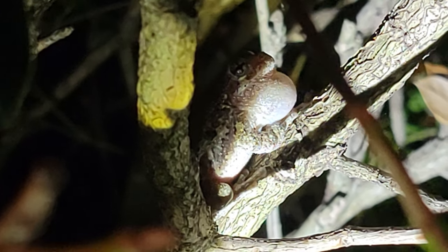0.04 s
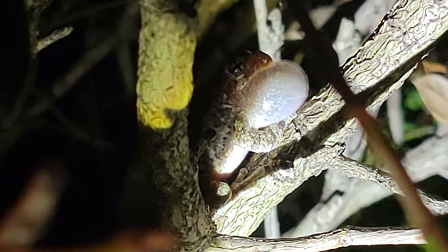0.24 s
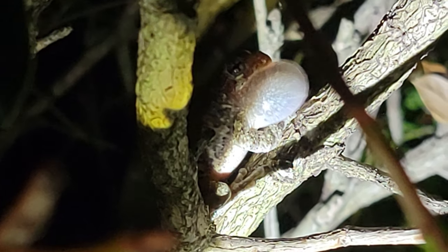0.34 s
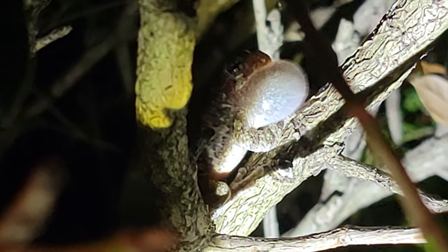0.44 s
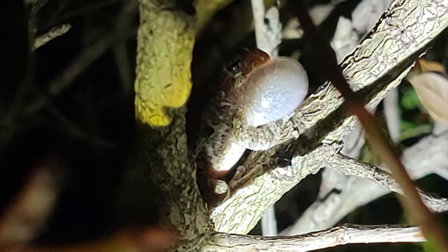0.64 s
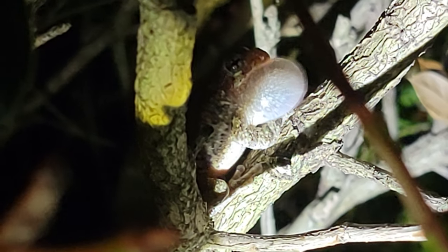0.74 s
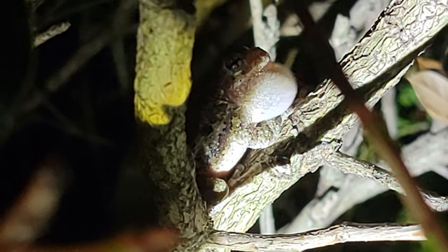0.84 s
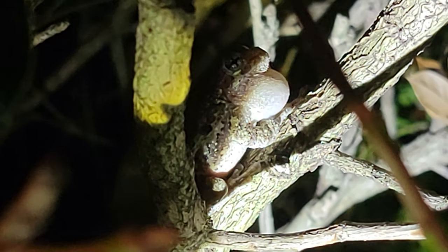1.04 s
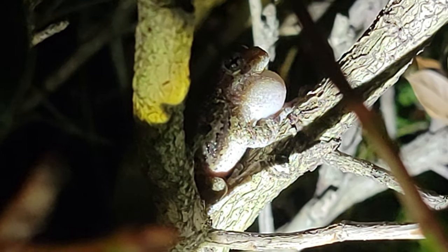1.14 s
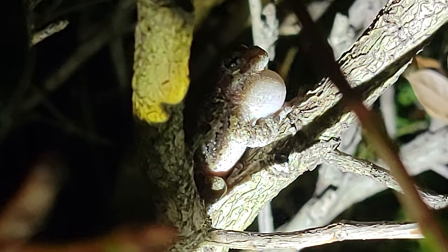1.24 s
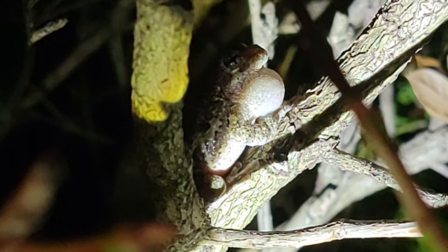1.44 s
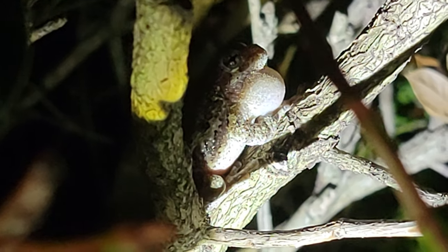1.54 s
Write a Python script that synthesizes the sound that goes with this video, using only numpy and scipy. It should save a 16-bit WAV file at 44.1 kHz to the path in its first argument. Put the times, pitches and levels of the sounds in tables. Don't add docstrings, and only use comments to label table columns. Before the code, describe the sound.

At night among branches, a distant frog's weak trill ends as a near frog bursts into a bright, hard, purring trill that slows slightly and stops, leaving soft hiss, rumble, a thin insect tone and leaf ticks.

```python
import sys
import numpy as np
from scipy import signal
from scipy.fft import rfft, irfft, next_fast_len
from scipy.io import wavfile
from scipy.ndimage import uniform_filter1d, minimum_filter1d

SR = 44100
rng = np.random.default_rng(int(sys.argv[2]) if len(sys.argv) > 2 else 0)


def materialize(psi):
    bounded = np.clip(np.atleast_2d(psi).T, -1, 1)
    quanta = np.round(bounded * 32767).astype(np.int16)
    wavfile.write(sys.argv[1], SR, quanta)


def makeup_ratio(level_db):
    decades = np.asarray(level_db, float) / 20
    return 10 ** decades


N = 70560
ECHO_HZ, ECHO_WIDTH_HZ = 2361, 1700


def evened(x):
    return x / np.sqrt(np.mean(x ** 2) + 1e-20)


def read(points, hz):
    point_hz, value = np.transpose(points)
    return np.interp(np.log(hz + 1), np.log(point_hz + 1), value)


def resonate(x, hz, width_hz):
    turn = np.exp(2j * np.pi * hz * np.arange(x.shape[-1]) / SR)
    r = np.exp(-np.pi * width_hz / SR)
    return 2 * (turn * signal.lfilter([1 - r], [1, -r], x / turn + 1e-18)).real


def resonate_twice(x, hz, width_hz):
    return resonate(resonate(x, hz, width_hz), hz, width_hz)


def delay(x, ms):
    size = next_fast_len(N + SR // 10)
    phase = np.exp(-2j * np.pi * np.fft.rfftfreq(size, 1 / SR) * ms / 1000)
    return irfft(rfft(x, size) * phase, size)[:N]


# freq_hz, density_db
FLOOR_SPECTRUM = [(25, -17.5), (45, -7.5), (74, -3.5), (250, -20.5), (600, -24), (1000, -18), (2400, -17.5),
                  (15900, -25.5)]
# freq_hz, correlation_-1_to_1
LIKENESS = [(60, 1), (240, 0.96), (950, -0.57), (3770, -0.049), (15000, -0.18)]
# freq_hz, lean_db
LEAN_SPECTRUM = [(60, -2.17), (240, 2.05), (950, 2.5), (3770, 9.5), (15000, 1.5)]


def night_floor():
    level_db, patch_db, flicker_db = -47.5, 2.0, .9
    frames, hz = N // 256 + 5, np.fft.rfftfreq(1024, 1 / SR)
    a, b, c, d, patches = rng.standard_normal((frames, 513, 5)).T
    patches = uniform_filter1d(patches, size=14, axis=0)
    patches = evened(uniform_filter1d(patches, size=6, axis=1))
    flicker = evened(uniform_filter1d(rng.standard_normal(frames), size=3))
    same = np.clip(read(LIKENESS, hz), -1, 1)[:, None]
    left = a + 1j * b
    right = same * left + np.sqrt(1 - same ** 2) * (c + 1j * d)
    lean_db = np.array([.5, -.5])[:, None, None] * read(LEAN_SPECTRUM, hz)[:, None]
    shape_db = read(FLOOR_SPECTRUM, hz)[:, None]
    z = np.array([left, right]) * makeup_ratio(shape_db + patch_db * patches + flicker_db * flicker + lean_db)
    return makeup_ratio(level_db) * evened(signal.istft(z, nperseg=1024, noverlap=768)[1][:, :N])


# pitch_hz, width_hz, level_db
HUMS = [
    (60, 6.6, -59.5),
    (75, 6, -56.5),
    (118.11, 9.5, -60),
    (358.2, 5.5, -69),
    (595.6, 12, -78.5),
    (2853, 60, -63),
]


def hums():
    spread = 0.41
    out = np.zeros((2, N))
    for hz, width_hz, level_db in HUMS:
        noise = rng.standard_normal(N) + spread * rng.standard_normal((2, N))
        out += makeup_ratio(level_db) * evened(resonate_twice(noise, hz, width_hz))
    return out


# start_s, level_db, pitch_hz, width_hz, length_s
RUSTLE_EVENTS = [(.005, -42, 60, 30, 0.0562), (0.049, -55, 690, 91, 0.069), (0.255, -52, 443, 600, .08),
                 (0.257, -47.5, 7000, 9000, 0.043), (1.04, -50.5, 1800, 1500, .03),
                 (1.068, -41, 2100, 500, .018), (1.098, -55.5, 2406, 2500, .06),
                 (1.26, -74, 1400, 300, .02), (1.29, -59.5, 980, 200, .025),
                 (1.413, -44.5, 2100, 2200, .016), (1.431, -47, 1600, 900, 0.0337),
                 (1.46, -49.5, 4000, 5000, .06), (1.505, -47.5, 4000, 6000, 0.027),
                 (1.51, -54, 560, 200, 0.0633), (1.562, -50, 350, 60, 0.074)]


def rustles():
    out, t = np.zeros((2, N + SR)), np.arange(SR // 10) / SR
    for start_s, level_db, hz, width_hz, length_s in RUSTLE_EVENTS:
        crackle_db = 2.5 * np.minimum(rng.exponential(1, len(t)), 4)
        grit = rng.standard_normal((3, len(t))) * makeup_ratio(crackle_db)
        burst = evened(resonate_twice(grit[:2] * .6 + grit[2], hz, width_hz))
        swell = np.sin(np.pi * np.minimum(t / length_s, 1) ** .6)
        out[:, round(start_s * SR):][:, :len(t)] += makeup_ratio(level_db) * burst * swell
    return out[:, :N]


def thicket(x, t60_s):
    taps = np.zeros((2, SR // 2))
    at = np.arange(100, SR // 2 - 40, 40) + rng.integers(0, 40, (2, (SR // 2 - 101) // 40))
    np.put_along_axis(taps, at, rng.choice([-1., 1.], at.shape), 1)
    taps *= makeup_ratio(-60 * np.arange(SR // 2) / SR / t60_s)
    return signal.fftconvolve(x, taps / np.linalg.norm(taps[0]), axes=1)[:, :N]


# delay_ms, left_db, right_db
BRANCH_ECHOES = [(1.9345, -32, -13.5), (4.4183, -8, -9.5), (7.609, -11.5, -19.5), (11.017, -21, -27),
                 (15.531, -14.5, -30.5), (26, -20.5, -27), (40.42, -29.5, -36.5)]


def branches(x):
    y = resonate(x, ECHO_HZ, ECHO_WIDTH_HZ)
    out = np.zeros((2, N))
    for delay_ms, left_db, right_db in BRANCH_ECHOES:
        out += [makeup_ratio(left_db) * delay(y[0], delay_ms), makeup_ratio(right_db) * delay(y[1], delay_ms * 1.2)]
    return out


# multiple, level_db
LARYNX = [(1, 0), (2, 2.5), (3, -8.5), (4, -26), (5, -27), (6, -20.5), (7, -34)]


def trill(times_s, effort):
    rise_s, fall_s, swell_power = .0064, .0032, 0.607
    low_hz, high_hz, step_at_s, step_s = 1163.5, 1400, -0.001678, 0.001858
    scoop_hz, scoop_s = 175.6, 0.000748
    wobble, sway_db, rasp_db = 0.01047, 0.48, -22
    pad = SR // 10
    out = np.zeros(N + SR)
    effort_s, level_db, over_db, pitch, stretch = np.transpose(effort)
    t = np.arange(-rise_s, fall_s, 1 / SR)
    for at in times_s:
        pitch_luck, level_luck, bright_luck = rng.standard_normal(3)
        length = np.interp(at, effort_s, stretch)
        phase = np.where(t < 0, t / rise_s, t / fall_s) / length
        swell = np.cos(np.pi / 2 * np.clip(phase, -1, 1)).clip(0) ** swell_power
        step = (1 + np.tanh((t / length - step_at_s) / step_s)) / 2
        scoop = scoop_hz * np.exp(-(t + rise_s * length).clip(0) / scoop_s)
        glide_hz = low_hz + (high_hz - low_hz) * step - scoop_hz * 0 - scoop
        glide_hz = glide_hz * np.interp(at, effort_s, pitch) * (1 + wobble * pitch_luck)
        turn = 2 * np.pi * np.cumsum(glide_hz) / SR
        bright_db = np.interp(at, effort_s, over_db) + sway_db * bright_luck
        tone = sum(makeup_ratio(db + (k > 1) * bright_db) * np.cos(k * turn) for k, db in LARYNX)
        rasp = makeup_ratio(rasp_db + bright_db) * rng.standard_normal(len(t))
        gain = makeup_ratio(np.interp(at, effort_s, level_db) + sway_db * level_luck)
        start = round((at - rise_s) * SR) + pad
        out[start:start + len(t)] += gain * swell * (tone + rasp)
    return out[pad:][:N]


# pitch_hz, width_hz, left_db, right_db, left_lag_ms
SAC_MODES = [(1290.6, 356.3, 0.5, 2, -0.1309), (1969.5, 130, 2, 5, -0.0087),
             (2355.9, 167.3, 5, 1.5, 0.4068), (2705.4, 378.7, 0.5, -2.95, .38), (3117, 250, -13, -4.5, .3),
             (3831, 202.8, 1, 3, 0.218), (4986, 170, 4.5, 1, 0.287), (5932, 130, 1, 2.5, .01),
             (6250, 700, -15.5, -17.5, .01), (7424, 300.4, 5, 5, 2.005), (8233, 61, 0.5, -4, .01)]


def sac(x):
    out = np.zeros((2, N))
    for k, (hz, width_hz, left_db, right_db, left_lag_ms) in enumerate(SAC_MODES):
        ring = (-1) ** k * resonate_twice(x, hz, width_hz * 1.5)
        out += [makeup_ratio(left_db) * delay(ring, left_lag_ms), makeup_ratio(right_db) * ring]
    return out


# time_s, level_db, overtone_db, pitch_factor, length_factor
FAR_FROG_EFFORT = [
    (0, -30.5, 4, 0.9226, 1),
    (0.101, -29, 4.5, 0.9326, 0.75),
    (.2, -32.5, 8, 0.9544, 1),
    (.225, -30, 8.5, .98, .75),
    (.245, -18, -5.73, 0.968, 0.91),
    (.266, -17.5, 4, .98, 0.86),
    (.287, -19.5, 6, .98, 0.77),
]


def far_frog():
    first_s, gap_s, pulses = .0066, .01995, 15
    pan_db, dull_hz, wet_db = 1.34, 3062, 2
    times_s = first_s + np.arange(pulses) * gap_s - .0003
    call = sac(trill(times_s, FAR_FROG_EFFORT)) * makeup_ratio([[pan_db], [-pan_db]])
    call = signal.sosfilt(signal.butter(8, dull_hz, fs=SR, output="sos"), call)
    return call + makeup_ratio(wet_db) * thicket(resonate(call, ECHO_HZ, 800), t60_s=0.096)


LEAD_INS_S = [.191, .214]
# pulse_number, gap_ms
PULSE_GAPS = [(1, 21.05), (2, 20.25), (8, 20.4), (14, 20.76), (21, 21.15), (27, 21.36), (31, 21.53),
              (32, 22.15), (33, 24.35)]
# time_s, level_db, overtone_db, pitch_factor, length_factor
NEAR_FROG_EFFORT = [
    (.19, -28.5, -13.5, 0.73, .9),
    (.214, -21, -22, .84, .8),
    (.236, -16.5, -24.5, 0.83, 0.67),
    (.257, -4, -16.5, .93, .7),
    (.277, -1.5, -9.5, .97, .9),
    (.30, -3.5, -4, .99, .98),
    (.34, -5.5, -0.19, 1.001, 1.01),
    (.5, -6.5, 1, 0.9994, 1.0514),
    (.93, -8, 0.23, 0.9788, 1.147),
]


def near_frog():
    first_s = .2361
    number, gap_ms = np.transpose(PULSE_GAPS)
    gaps_s = np.interp(np.arange(1, number[-1] + 1), number, gap_ms) / 1000
    times_s = np.r_[LEAD_INS_S, first_s + np.cumsum(np.r_[-.0006, gaps_s])]
    call = sac(trill(times_s, NEAR_FROG_EFFORT))
    wet = makeup_ratio(-12) * thicket(resonate(call, ECHO_HZ, ECHO_WIDTH_HZ), t60_s=0.1233)
    late = makeup_ratio(-19) * thicket(resonate_twice(call, 2540, 370), t60_s=.27)
    return call + branches(call) + wet + late


def scene():
    return night_floor() + hums() + rustles() + makeup_ratio(-2.5) * (far_frog() + near_frog())


def band_limit(x):
    return signal.sosfilt(signal.butter(12, 16120, fs=SR, output="sos"), x)


def record(dry):
    duck, ceiling_db, hold = 0.01667, 0.132, round(.003 * SR)
    power = abs(uniform_filter1d((dry ** 2).mean(0), size=4000))
    over_db = np.maximum(10 * np.log10(power + 1e-12) + 45, 0)
    x = dry / makeup_ratio(duck * (over_db - 32.5))
    room = np.minimum(makeup_ratio(ceiling_db) / (abs(x).max(0) + 1e-9), 1)
    limit = uniform_filter1d(minimum_filter1d(room, 2 * hold), hold)
    return band_limit(x * limit)


dry = scene()
out = record(dry)
materialize(out)
```